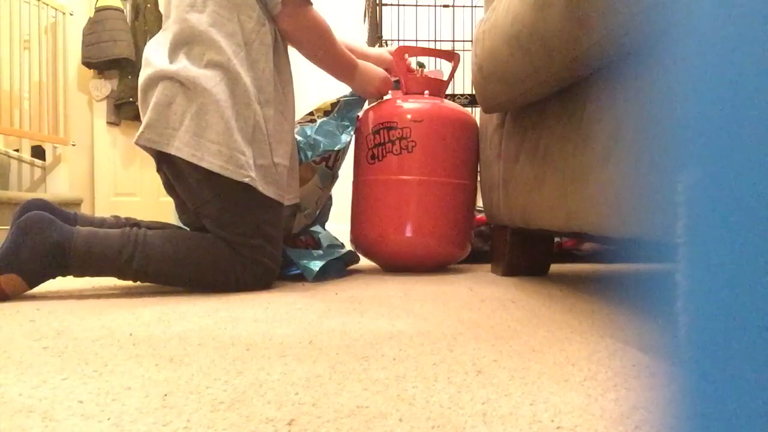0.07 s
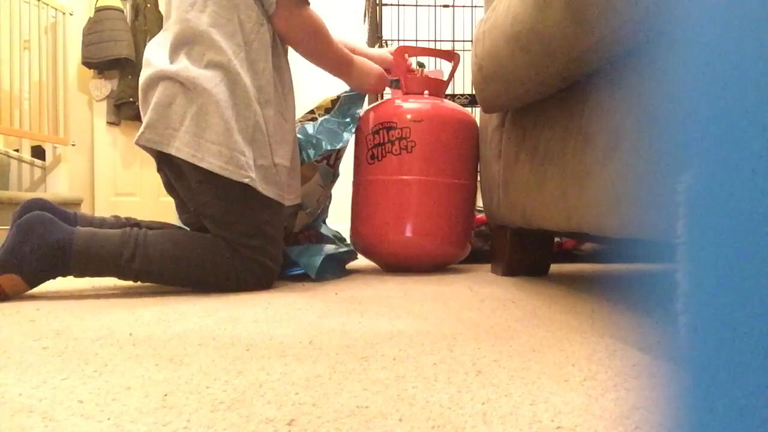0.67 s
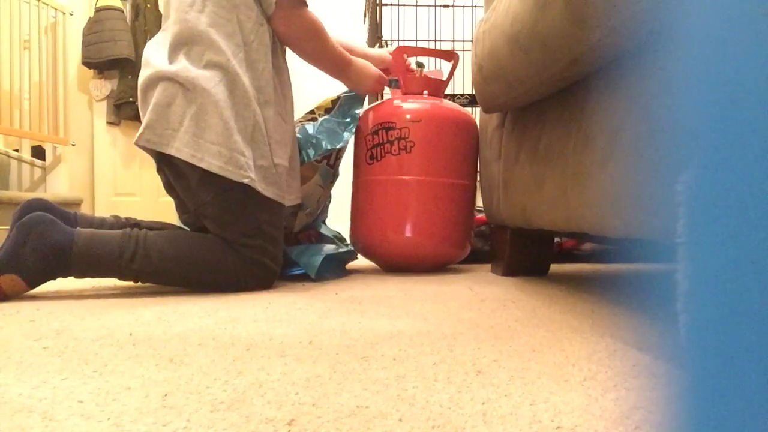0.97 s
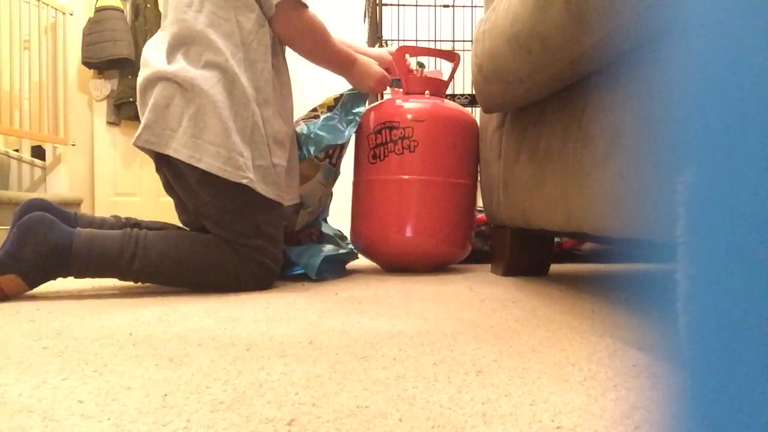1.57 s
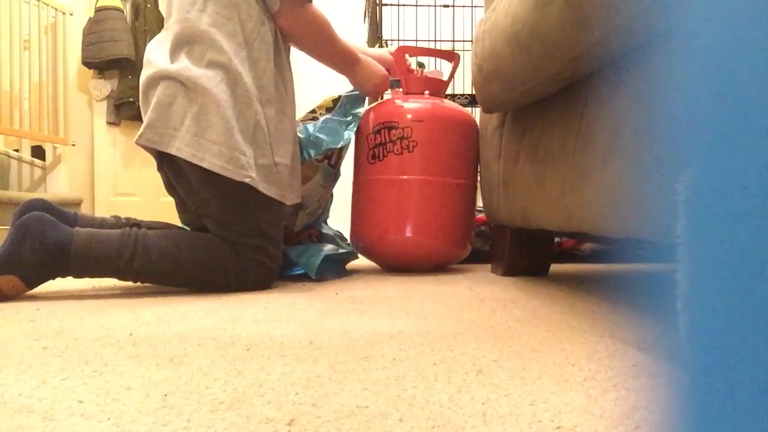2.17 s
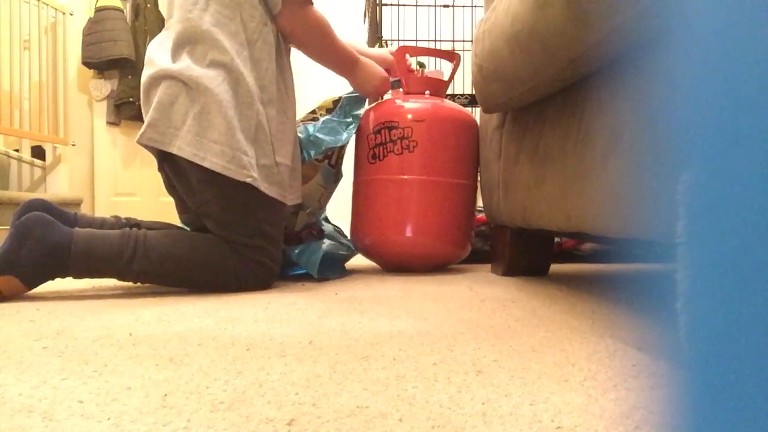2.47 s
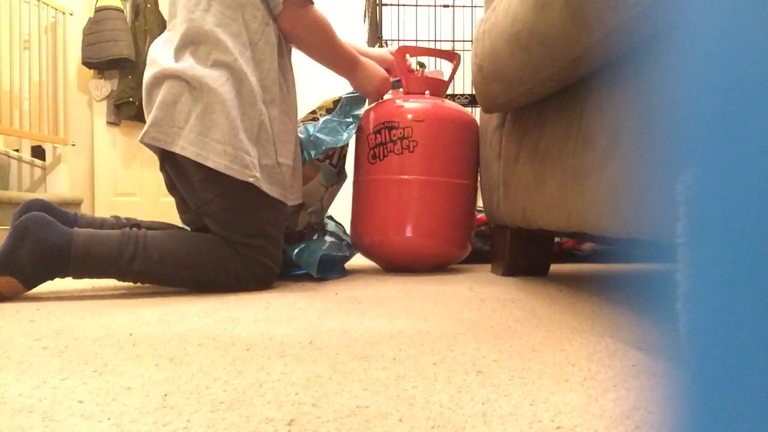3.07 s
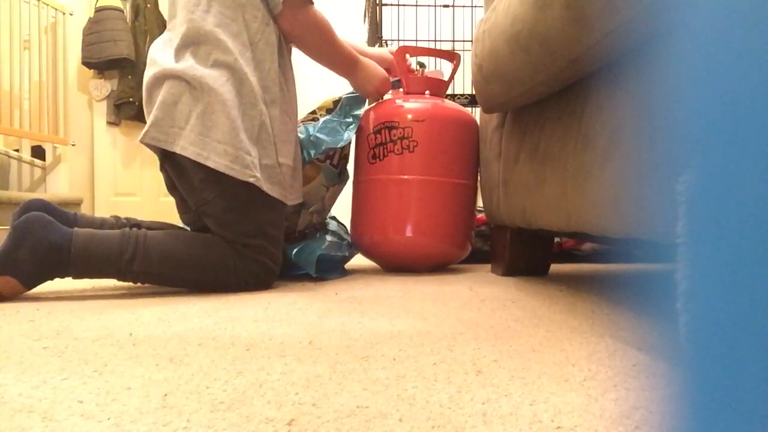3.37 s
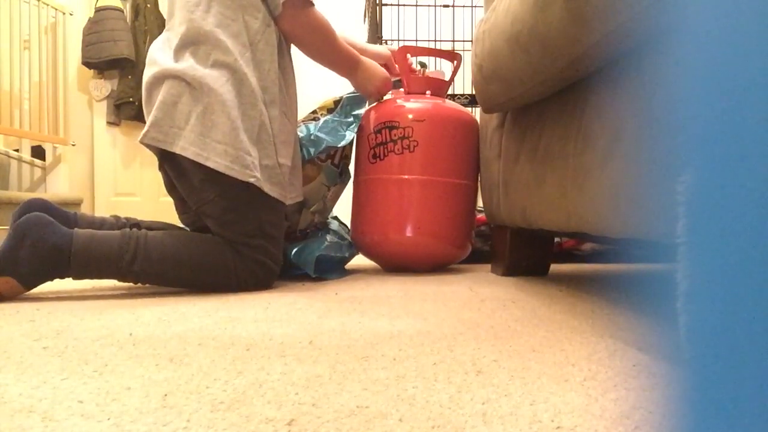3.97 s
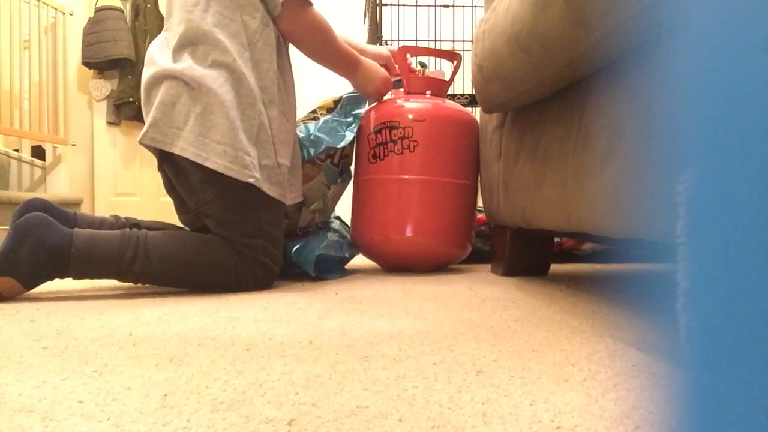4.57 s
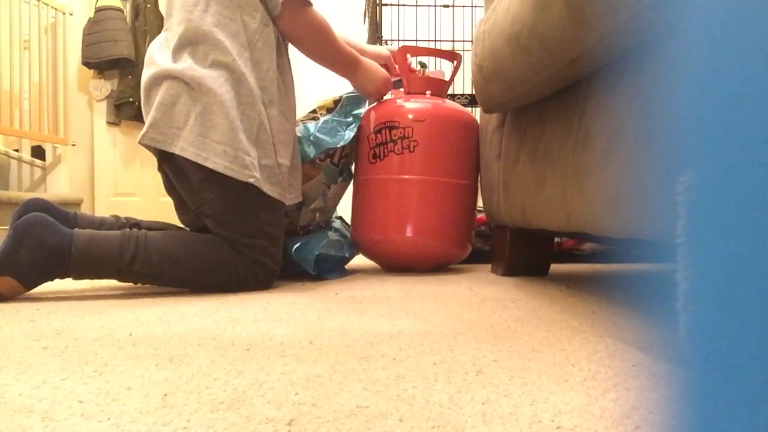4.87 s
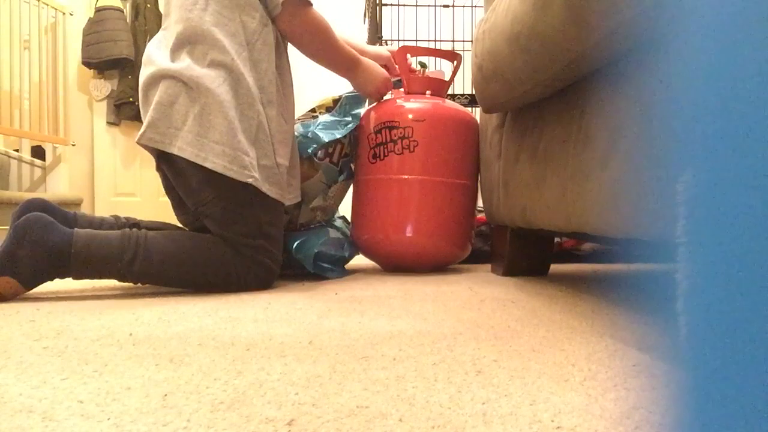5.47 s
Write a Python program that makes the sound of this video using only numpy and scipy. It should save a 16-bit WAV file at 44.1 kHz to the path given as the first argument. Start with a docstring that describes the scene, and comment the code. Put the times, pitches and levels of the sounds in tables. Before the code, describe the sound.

A short hiss of gas, a pause with crackling foil, then a longer hiss as a foil balloon fills with soft flops.

```python
"""A foil balloon is filled from a small gas cylinder in a carpeted room.
A short press of the nozzle: the jet hisses through the neck and buffets the slack foil; a faint hum.
In the pause the foil slides and its creases snap in the hands, over a low drone in the house.
At 2.2 s a long press puffs the neck open. The drone stops; weight shifts and the floor thuds.
The balloon swells: the hiss changes colour, the foil shakes harder and its panels flop."""
import sys
import numpy as np
from scipy import signal
from scipy.fft import rfft, irfft, next_fast_len
from scipy.io import wavfile
from scipy.ndimage import map_coordinates

SR = 44100
rng = np.random.default_rng(int(sys.argv[2]) if len(sys.argv) > 2 else 0)


def transcribe(u):
    """Save the signal u as a 16-bit wav file named by the first command-line argument.

    u: samples, shape (n,) or (channels, n), limited to [-1, 1]; the rate is SR.
    q: integer samples, one column per channel.
    """
    v = np.clip(np.atleast_2d(u).T, -1, 1)
    q = np.round(v * 32767).astype(np.int16)
    wavfile.write(sys.argv[1], SR, q)


N = 248283
TIME = np.arange(N) / SR


# nozzle presses: open_s, shut_s, hiss_db, lower_rel_db, sizzle_rel_db, buffet_db
NOZZLE_PRESSES = [(-.3, 0.7, -44.5, -9.5, -6.5, -68.5), (2.226, 5.8, -45, -5, -8, -65.5)]
# balloon fill: time_s, swollen_share
FILL_CURVE = [(2.8, 0.24), (4.0, 0.31), (5.2, 1)]
# hiss colour in the first press, early in the second, and swollen: freq_hz, level_db
FIRST_SPECTRUM = [(400, -13), (1150, -19), (1450, -13.5), (2120, -14.5), (2350, -7.5), (3000, -2.5),
                  (3450, -1.5), (4350, -7.5), (5200, -2.5), (7200, -2), (7650, -2), (8100, 0.5),
                  (8750, 2.5), (10300, -4), (11000, 1.5), (11650, 2), (12300, 0), (13550, -1), (15200, -8)]
SECOND_SPECTRUM = [(400, -12), (1150, -13.5), (1950, -12), (2350, -7.5), (2800, 0.5), (3350, 1),
                   (4750, -2.5), (5200, 0), (6000, 0), (7700, -1), (8200, 3), (9300, 2.5), (9900, -1.5),
                   (10400, -1), (11000, 0.5), (11700, 1.5), (12700, -1.5), (13100, -6), (15200, -16)]
SWOLLEN_SPECTRUM = [(400, -16), (1050, -20.5), (1900, -10), (2450, -3), (3400, -1.5), (4750, -5),
                    (5300, -2), (6100, -1), (6600, -2), (7700, -4), (8250, -1), (9100, -1), (10250, -7),
                    (11200, -1.5), (12700, -7.5), (15200, -19.5)]
def gas():
    """Two presses of the nozzle; in the second the hiss changes colour as the balloon swells."""
    first_press, second_press = NOZZLE_PRESSES
    fill_s, fill_share = np.transpose(FILL_CURVE)
    swollen = np.interp(TIME, fill_s, fill_share)
    first = turbulence(FIRST_SPECTRUM, neck_share=0.22)
    second = np.sqrt(1 - swollen) * turbulence(SECOND_SPECTRUM, neck_share=1.17)
    second += np.sqrt(swollen) * turbulence(SWOLLEN_SPECTRUM, neck_share=0.65)
    return jet(first_press, first, swollen) + jet(second_press, second, swollen) + chuff(second_press[0])


def jet(press, stream, swollen, flutter_db=0.46, flutters_per_s=24, rough_db=0.7, eddies_per_s=90):
    """The hiss surges, sags and flutters with the gas pressure; its lower band thins fastest."""
    open_s, shut_s, hiss_db, lower_db, sizzle_db, buffet_db = press
    held_s = np.maximum(TIME - open_s, 0)
    surge = np.exp(-held_s / 0.053)   # pent-up gas bursts out bright
    pinch = np.exp(np.minimum(TIME - shut_s, 0) / 0.017)   # valve sizzles as it is pinched shut
    squeeze = np.exp(-((TIME - 0.613) / 0.053) ** 2)   # grip tightens before the first release
    hiss_db = hiss_db + 7.5 * surge + 1.5 * pinch - 0.07 * held_s + flutter_db * drift(flutters_per_s)
    lower_db = lower_db + 3.5 * squeeze - 1.5 * pinch + 2 * surge - held_s
    sizzle_db = sizzle_db + 14 * surge + 2 * pinch
    lower, upper = split(stream, hz=4820)
    middle, sizzle = split(upper, hz=12970)
    hiss = sum(rms_one(part) * amp(hiss_db + db + rough_db * drift(eddies_per_s))
               for part, db in [(lower, lower_db), (middle, 0), (sizzle, sizzle_db)])
    return gate(open_s, shut_s) * (hiss + buffet(buffet_db, held_s, swollen))


# nozzle and neck resonances: centre_hz, width_hz, lift_db (scaled by neck_share)
NECK_MODES = [(2305, 70, 5.5), (2460, 50, 2.5), (2680, 120, 2.2), (3003, 70, 2.5), (3280, 60, 2),
              (4042, 55, 3.8), (4188, 60, 4.8), (4403, 88, 2.8), (5088, 55, 4.4), (5194, 55, 3.8),
              (5420, 60, 3.8), (5781, 93, 3), (6023, 90, 3.8), (7030, 60, 2.5), (8155, 45, 4.6),
              (8247, 45, 5.2), (8400, 40, 2.5), (8484, 45, 3.6), (8844, 50, 4.4), (9034, 45, 3),
              (9356, 100, 3), (11181, 143, 2.2), (11466, 60, 3.2), (11690, 80, 2.2), (12247, 45, 2.7),
              (12726, 80, 4.6), (13425, 66, 2.5), (13695, 61, 2.8), (14674, 48, 3.5)]
def turbulence(spectrum, neck_share):
    """Turbulence rings in nozzle and neck; foil and room add a shifting ripple."""
    peaks = [(hz, width_hz, neck_share * lift_db) for hz, width_hz, lift_db in NECK_MODES]
    rippled = foil_tremble(room(noise(), wet_db=-10.5))
    return rms_one(neck_flap(coloured(rippled, spectrum, peaks)))


def foil_tremble(x, speed_share=0.002, trembles_per_s=7):
    """The foil trembles, so the ripple of its reflections slides about."""
    lag_samples = np.cumsum(speed_share * drift(trembles_per_s))
    return map_coordinates(x, [np.arange(N) + lag_samples], order=5, mode="mirror")


# main neck resonances: centre_hz, width_hz
FLAP_MODES = [(2950, 340), (3400, 290), (5300, 410), (6030, 270), (8250, 440), (8900, 960), (11500, 570),
              (12700, 300)]
def neck_flap(x, flare_db=1.5, flares_per_s=16):
    """The neck flaps in the stream; each main resonance swells and fades on its own."""
    return x + sum(resonate(x, hz, width_hz) * (amp(flare_db * drift(flares_per_s)) - 1)
                   for hz, width_hz in FLAP_MODES)


def chuff(open_s, delay_s=0.043, pitch_hz=3220, width_hz=650, level_db=-51.5):
    """The first spurt blows the flat neck open with a hollow puff."""
    ring = resonate(noise(), pitch_hz, width_hz)
    puff = rms_one(resonate(ring, pitch_hz, 2 * width_hz))
    return amp(level_db) * swell(open_s + delay_s, rise_s=0.047, fall_db_per_s=400) * puff


# shaken foil: freq_hz, level_db
BUFFET_SPECTRUM = [(70, 1.5), (110, -11), (160, -1), (220, -0.5), (300, 3.5), (380, -4.5), (490, -12.5),
                   (650, -6), (900, -16.5), (1300, -16.5), (2000, -52)]
def buffet(base_db, held_s, swollen, settle_db_per_s=3.5, unfold_db=12, lump_db=2, lumps_per_s=30):
    """Slack foil settles in the stream, then shakes harder as swelling pulls its panels apart."""
    shaking_db = base_db - settle_db_per_s * held_s + unfold_db * swollen
    return coloured(noise(), BUFFET_SPECTRUM) * amp(shaking_db + lump_db * drift(lumps_per_s))


# foil sliding in the hands: peak_s, rise_s, fall_db_per_s, level_db, lower_rel_db
FOIL_SLIDES = [(.77, .025, 200, -59, -7), (.815, 0.033, 220, -66.5, 1), (.917, 0.024, 354, -64.5, -1),
               (.997, 0.029, 352, -59.5, -8), (1.16, 0.085, 328, -58, -5), (1.285, 0.075, 140, -70, -1),
               (1.332, 0.021, 230, -62.5, -17), (1.49, 0.061, 75, -71, 1), (1.862, 0.083, 190, -73, 8.5),
               (1.998, 0.078, 204, -63, 4), (2.072, 0.045, 320, -68, -10)]
# sliding foil: freq_hz, level_db
RUSTLE_SPECTRUM = [(1000, -17), (1800, -13.5), (2900, -4.5), (4600, -10.5), (5500, -6.5), (7500, -5.5),
                   (8400, 3), (10300, -4), (11500, 3.5), (13000, -4), (15000, -14)]
def rustle(clicks_per_s=11000, spread_db=5, trim_db=-1, lower_trim_db=-2):
    """Sliding foil sheds dense tiny clicks of uneven size; each slide swells and fades."""
    upper_power, lower_power = 0, 0
    for peak_s, rise_s, fall_db_per_s, level_db, lower_rel_db in FOIL_SLIDES:
        slide = amp(level_db + trim_db) * swell(peak_s, rise_s, fall_db_per_s)
        upper_power += slide ** 2
        lower_power += (slide * amp(lower_rel_db + lower_trim_db)) ** 2
    sizes = amp(spread_db * np.minimum(rng.exponential(1, N), 4)) * rng.choice([-1, 1], N)
    clicks = sizes * (rng.random(N) < clicks_per_s / SR)
    crinkle = coloured(room(clicks, wet_db=-8.5), RUSTLE_SPECTRUM)
    lower, upper = split(crinkle, hz=7300)
    return np.sqrt(upper_power) * rms_one(upper) + np.sqrt(lower_power) * rms_one(lower)


# creases flipping: start_s, level_db, pitch_hz
CREASE_SNAPS = [(0.756, -44, 5400), (.801, -53, 3600), (0.85, -53.5, 2900), (0.91, -51, 5270),
                (0.913, -62, 5400), (.919, -46, 12500), (.9737, -50, 11100), (0.9856, -48, 5870),
                (1.0174, -56, 5030), (1.12, -58, 3300), (1.133, -49, 5830), (1.162, -53, 2900),
                (1.2415, -51, 3850), (1.2746, -52, 3500), (1.3227, -35, 5360), (1.4726, -57, 3600),
                (1.481, -58, 6000), (1.7698, -58, 3000), (1.7703, -56, 5300), (1.82, -55, 8000),
                (1.8265, -49.5, 3300), (1.846, -46, 2950), (1.857, -53, 3100), (1.942, -57, 3400),
                (1.9558, -49, 2590), (1.9626, -52, 3300), (1.982, -52, 2900), (1.99, -53, 2950),
                (2.0085, -47.5, 3120), (2.1536, -57.5, 3200)]
def snaps(width_share=0.07, crack_db=-14, crack_s=0.00092, ragged_db=-25, ragged_s=0.0023,
          full_snap_db=-31, trim_db=-0.5, delay_s=0.0015):
    """A crease flips: a crack and a few cycles of its facet; weaker flips are drier, more ragged."""
    out, t = np.zeros(N), TIME[:1024]
    for start_s, level_db, hz in CREASE_SNAPS:
        grit = noise(len(t))
        dryness = amp(0.53 * (full_snap_db - level_db))
        buckling = (t == 0) + dryness * amp(ragged_db) * grit * np.exp(-t / ragged_s)
        ring = resonate(buckling, hz, width_share * dryness * hz)
        facet = band(ring, hz / np.sqrt(2), hz * np.sqrt(2))
        crack = band(grit * np.exp(-t / crack_s), 1900, 13000)
        snap = peak_one(facet) + dryness * amp(crack_db) * peak_one(crack)
        add(out, start_s + delay_s, amp(level_db + trim_db) * snap)
    return room(out, wet_db=-14)


# panels bulging, and one soft cloth bump at 1.472 s: start_s, level_db, centre_hz
PANEL_FLOPS = [(0.571, -58.5, 115), (0.652, -51, 370), (0.723, -55.5, 310), (0.812, -60, 477),
               (1.384, -61.5, 113), (1.472, -60.5, 292), (1.636, -67, 129), (2.15, -62, 302),
               (3.078, -57, 259), (3.385, -51.5, 218), (3.735, -57, 85), (4.083, -57, 297),
               (4.205, -60, 70), (4.466, -50.5, 260), (4.479, -51, 437), (4.505, -58, 75),
               (4.785, -52.5, 252), (4.81, -49.5, 323), (5.014, -49.5, 215), (5.065, -52, 270),
               (5.106, -52.5, 270), (5.197, -51.5, 185), (5.275, -50.5, 280), (5.311, -51, 240),
               (5.466, -53, 286), (5.6, -49.5, 198)]
def flops(decay_cycles=3.8, band_ratio=1.36, rub_db=-11, rub_s=0.012, trim_db=0.5):
    """A panel bulges with a dull, pitchless knock and rubs briefly on its neighbour; at 1.47 s cloth bumps the
    foil the same way."""
    out, t = np.zeros(N), TIME[:8192]
    for start_s, level_db, hz in PANEL_FLOPS:
        push = np.exp(-t * hz / decay_cycles) + amp(rub_db) * np.exp(-t / rub_s)
        bump = band(noise(len(t)) * push, hz / band_ratio, hz * band_ratio)
        add(out, start_s, amp(level_db + trim_db) * peak_one(bump))
    return out


# strokes along the balloon: peak_s, rise_s, fall_db_per_s, level_db, centre_hz
BRUSH_STROKES = [(1.49, 0.07, 60, -76, 714), (1.53, .13, 70, -80, 3700), (1.6, 0.15, 25, -79, 1150),
                 (1.705, .05, 110, -77, 1220), (2.81, .2, 39, -65.5, 1190), (5.3, 1, 5, -70, 1020)]
def brushes(band_ratio=1.41, uneven_db=3, wobbles_per_s=35.2):
    """Cloth and hands brush softly along the balloon as the grip shifts."""
    out = np.zeros(N)
    for peak_s, rise_s, fall_db_per_s, level_db, hz in BRUSH_STROKES:
        rub = rms_one(band(noise(), hz / band_ratio, hz * band_ratio))
        out += amp(level_db) * swell(peak_s, rise_s, fall_db_per_s) * rub
    return out * amp(uneven_db * drift(wobbles_per_s))


# floor under the carpet: pitch_hz, t60_s
FLOOR_RESONANCES = [(102, 0.24), (167, .25), (200, 0.13)]
# pushes on the floor: start_s, mode1_db, mode2_db, mode3_db
WEIGHT_SHIFTS = [(3.901, -68, -58, -49.5), (3.921, -49, -60, -57), (3.954, -64, -49, -56)]
def thuds(contact_s=0.0012, scuff_db=-20):
    """Weight shifts on the carpet: soft pushes set the floor booming briefly."""
    out, t = np.zeros(N), TIME[:SR // 2]
    push = t * np.exp(-t / contact_s)
    for start_s, *modes_db in WEIGHT_SHIFTS:
        scuff = amp(scuff_db) * rms_one(band(noise(len(t)), 150, 400))
        for (hz, t60_s), level_db in zip(FLOOR_RESONANCES, modes_db):
            fade = amp(-60 * t / t60_s)
            ring = signal.fftconvolve(push, np.cos(2 * np.pi * hz * t) * fade)[:len(t)]
            boom = peak_one(band(ring, hz / 2, 2 * hz))
            add(out, start_s, amp(level_db) * (boom + scuff * fade))
    return out


def hum(pitch_hz=91.4, level_db=-68.5, waver_hz=0.9, waver_db=0.5):
    """A faint low hum during the first press."""
    tone = sine(pitch_hz + waver_hz * drift(8))
    return amp(level_db + waver_db * drift(11)) * tone * gate(-0.1, 0.54)


def drone(pitch_hz=54.3, peak_s=2.4, peak_db=-67.5, slope_db_per_s=5, stop_s=3.33):
    """A deep, slightly wavering drone in the house swells, eases and stops."""
    tone = sine(pitch_hz + 0.26 * drift(3))
    level_db = peak_db - slope_db_per_s * np.abs(TIME - peak_s) + 0.2 * drift(4.4)
    return amp(level_db) * tone * gate(-0.1, stop_s, fall_db_per_s=45)


# room background: freq_hz, level_db
AIR_SPECTRUM = [(60, 0.5), (85, 2.5), (120, -1), (160, -5), (280, -11), (450, -16), (1000, -20),
                (2000, -21), (4000, -22.5), (8500, -24.5), (12000, -27.5), (15000, -28)]
def still_air(level_db=-68):
    """Still air of the house: steady, bass-heavy noise."""
    return amp(level_db) * coloured(room(noise(), wet_db=-13), AIR_SPECTRUM)


def room(x, wet_db, t60_s=0.055):
    """Direct sound, then a short diffuse tail from walls and furniture."""
    t = TIME[:SR // 2]
    tail = noise(len(t)) * amp(-60 * t / t60_s) * (t > 0.004)
    return x + amp(wet_db) * signal.fftconvolve(x, tail / np.linalg.norm(tail))[:N]


def gate(open_s, shut_s, rise_s=0.072, fall_db_per_s=205):
    """Smooth rise, hold, exponential decay after shut_s."""
    opening = np.clip((TIME - open_s) / rise_s, 0, 1)
    return np.sin(opening * np.pi / 2) ** 2 * amp(-fall_db_per_s * np.maximum(TIME - shut_s, 0))


def swell(peak_s, rise_s, fall_db_per_s):
    """Smooth rise, then decay; no hold."""
    return gate(peak_s - rise_s, peak_s, rise_s, fall_db_per_s)


def coloured(x, spectrum, peaks=()):
    """Apply a broad spectrum and narrow resonances; unit power."""
    size = next_fast_len(N)
    hz = np.arange(size // 2 + 1) * SR / size + 1e-3
    points_hz, levels_db = np.transpose(spectrum)
    db = np.interp(np.log(hz), np.log(points_hz), levels_db)
    for centre_hz, width_hz, lift_db in peaks:
        db += lift_db / (1 + (2 * (hz - centre_hz) / width_hz) ** 2)
    low_cut = 1 / (1 + (points_hz[0] / (np.sqrt(2) * hz)) ** 4)
    return rms_one(irfft(rfft(x, size) * amp(db) * low_cut, size)[:N])


def resonate(x, hz, width_hz):
    """Two-pole resonance, unit peak gain."""
    r = np.exp(-np.pi * width_hz / SR)
    feedback = [1, -2 * r * np.cos(2 * np.pi * hz / SR), r * r]
    return signal.lfilter(np.array([1, 0, -1]) * (1 - r * r) / 2, feedback, x + 1e-18)


def band(x, low_hz, high_hz):
    """Band-pass."""
    sos = signal.butter(2, [low_hz, min(high_hz, 0.45 * SR)], "band", fs=SR, output="sos")
    return signal.sosfilt(sos, x + 1e-18)


def split(x, hz):
    """Parts below and above hz."""
    lower = signal.sosfiltfilt(signal.butter(4, hz, fs=SR, output="sos"), x)
    return lower, x - lower


def sine(hz):
    """Unit-power sine along a pitch curve."""
    return np.sqrt(2) * np.sin(2 * np.pi * np.cumsum(hz) / SR)


def noise(samples=N):
    """White noise."""
    return rng.standard_normal(samples)


def drift(knots_per_s):
    """Slow random curve, unit spread."""
    knots = noise(1024)
    return np.interp(TIME * knots_per_s, np.arange(len(knots)), knots) * np.sqrt(3 / 2)


def amp(db):
    """Decibels to gain."""
    return 10 ** (np.asarray(db) / 20)


def rms_one(x):
    """Scale to unit power."""
    return x / np.sqrt(np.mean(x ** 2) + 1e-20)


def peak_one(x):
    """Scale to unit peak."""
    return x / np.abs(x).max()


def add(out, start_s, sound):
    """Mix a short sound in at start_s."""
    start = int(np.clip(start_s * SR, 0, N - 1))
    out[start:start + len(sound)] += sound[:N - start]


def scene():
    """All sources, alike in both channels."""
    mono = gas() + hum() + rustle() + brushes() + snaps() + flops() + thuds() + drone() + still_air()
    return np.array([mono, mono])


def record(dry, low_hz=33, cutoff_hz=15400):
    """The microphone loses the deepest bass; the top is cut steeply."""
    thinned = signal.sosfilt(signal.butter(2, low_hz, "high", fs=SR, output="sos"), dry)
    return signal.sosfilt(signal.ellip(12, 0.1, 80, cutoff_hz, fs=SR, output="sos"), thinned)


dry = scene()
out = record(dry)
transcribe(out)
```